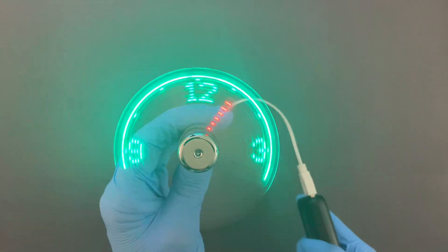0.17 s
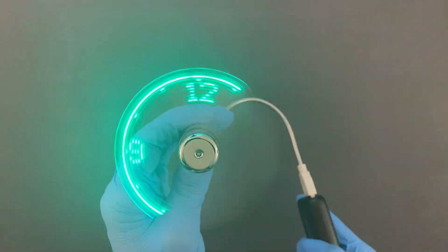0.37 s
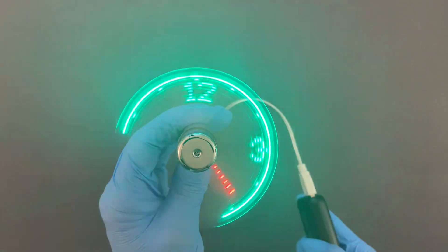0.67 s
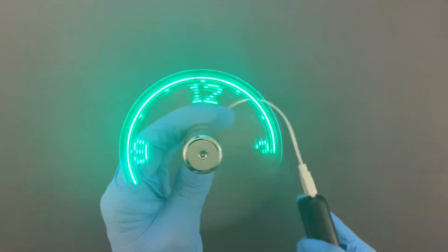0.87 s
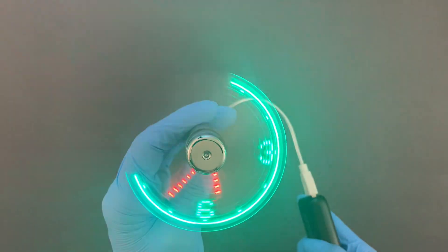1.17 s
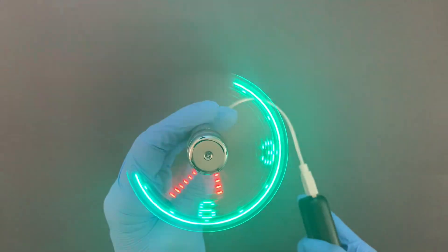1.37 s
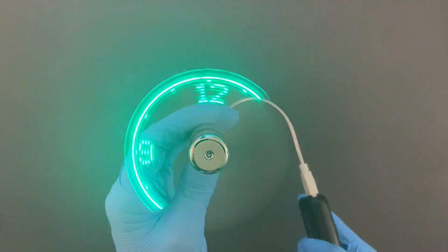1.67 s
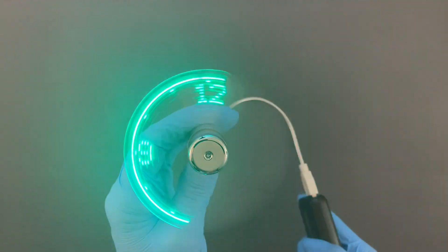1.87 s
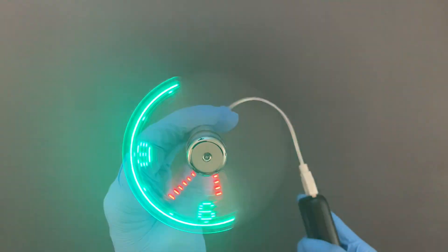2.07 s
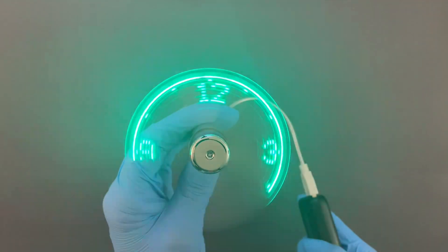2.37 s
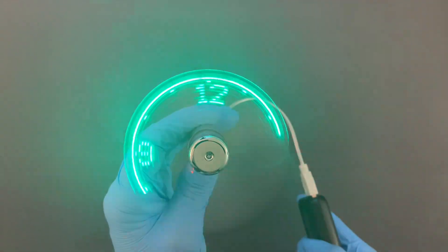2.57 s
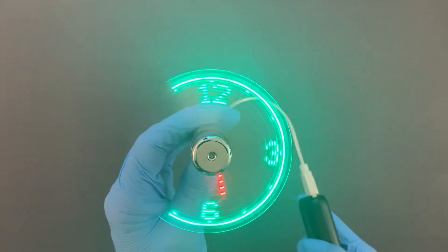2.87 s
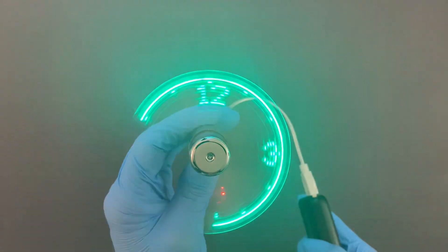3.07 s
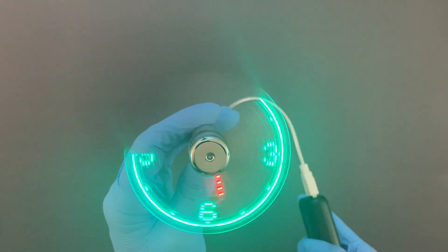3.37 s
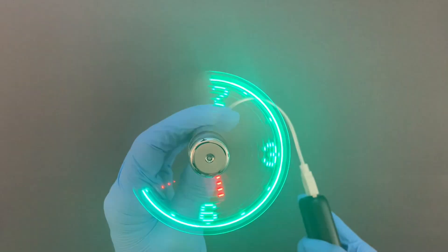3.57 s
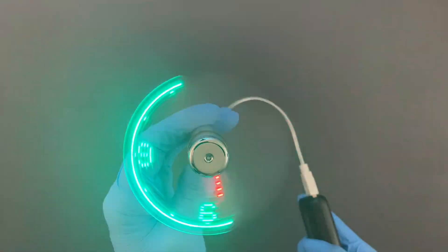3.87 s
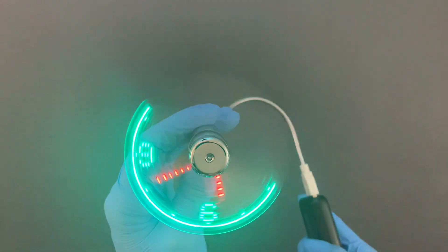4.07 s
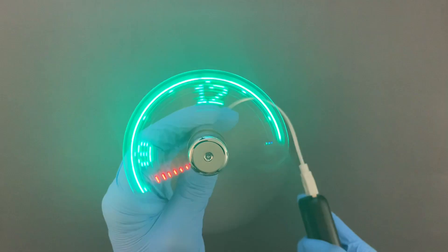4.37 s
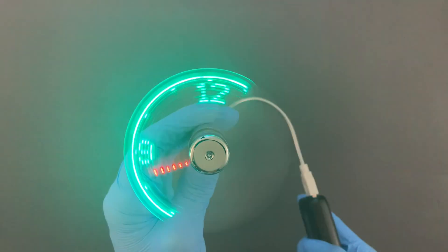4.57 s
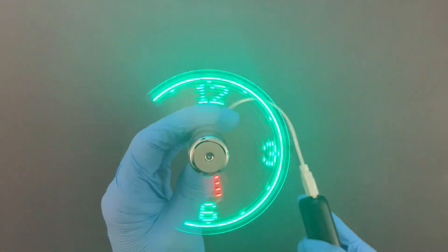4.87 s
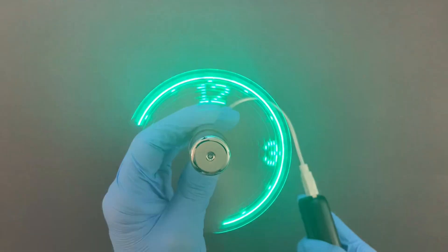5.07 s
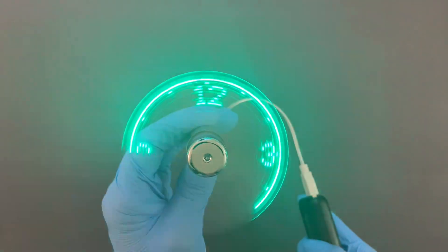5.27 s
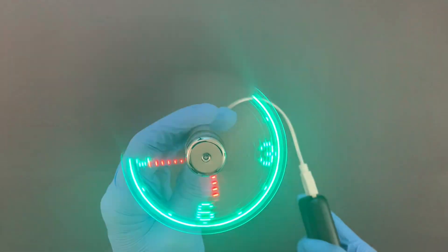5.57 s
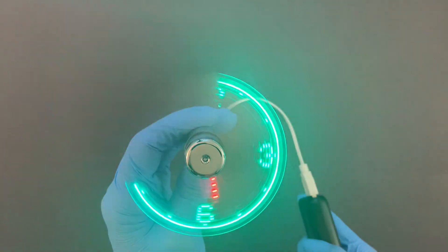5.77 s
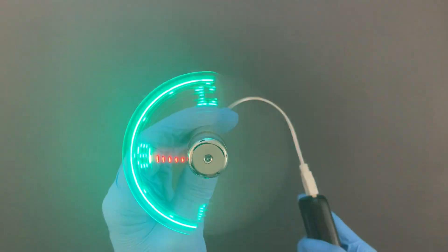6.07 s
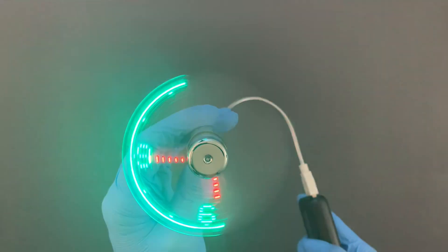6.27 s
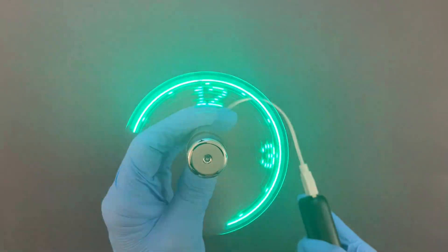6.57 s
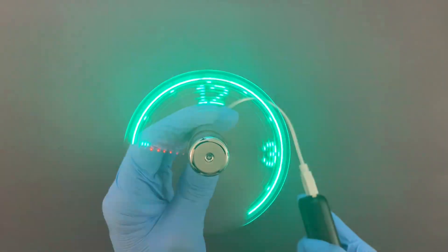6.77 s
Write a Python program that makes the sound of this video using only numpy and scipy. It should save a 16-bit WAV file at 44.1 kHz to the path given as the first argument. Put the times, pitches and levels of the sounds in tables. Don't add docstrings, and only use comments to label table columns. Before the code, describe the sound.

A small hand-held fan whines thinly under heavy, gusty wind rumble on the microphone while a button clicks in and out about twice a second.

```python
import sys
import numpy as np
from scipy import signal
from scipy.fft import rfft, irfft, next_fast_len
from scipy.io import wavfile
from scipy.ndimage import uniform_filter1d

SR = 44100
rng = np.random.default_rng(int(sys.argv[2]) if len(sys.argv) > 2 else 0)


def attenuation_scalar(level_db):
    decades = np.asarray(level_db, float) / 20
    return 10 ** decades


def file_out(sig):
    cols = np.atleast_2d(sig).T
    lim = np.clip(cols, -1, 1)
    pcm = np.round(lim * 32767).astype(np.int16)
    wavfile.write(sys.argv[1], SR, pcm)


N = 305833

# start_s (middle of the gust), length_s, rise_db, eddy_hz
GUSTS = [(0.083, 0.079, 11, 25), (4.85, 0.16, 7.5, 100), (0.348, 0.11, 7.5, 22), (0.618, 0.13, 11.5, 34.4),
         (0.975, .09, 3.5, 80), (1.128, 0.09, 14, 43.4), (1.364, 0.057, 12.5, 80), (1.471, .07, 14, 70),
         (1.618, 0.047, 23, 61), (1.7, 0.092, 7.5, 22), (1.836, 0.18, 9, 60), (2.04, 0.06, 13.5, 37.2),
         (2.23, 0.098, 4, 80), (2.381, 0.086, 11.5, 39.7), (2.597, 0.076, 18.5, 50), (2.86, 0.084, 5, 51),
         (3.082, 0.052, 8, 109), (3.118, .07, 7, 22), (3.201, .09, 15.5, 85), (3.372, 0.076, 17, 74.4),
         (3.743, 0.091, 11, 21.8), (4.111, 0.045, 17.5, 48.6), (4.301, 0.062, 11.5, 25),
         (4.599, 0.064, 24.5, 61.5), (5.028, 0.031, 19, 55), (5.11, 0.08, 11.5, 25),
         (5.168, 0.14, 14.5, 87.5), (5.387, 0.072, 13.5, 42.6), (5.88, 0.067, 1, 45), (6.585, 0.16, 10, 55)]
# pitch_hz, level_db (per Hz)
RUMBLE_TONE = [(2.9, -78), (5.0, -4.5), (21, 6.5), (32, -2.5), (62, -12), (113, -30.5), (141, -33),
               (172, -41), (253, -57.5), (400, -64), (520, -61), (880, -120)]
# start_s, level_db
STREAM = [(0, -6.5), (.5, 0.5), (.9, -2), (1.2, 2.5), (1.6, -1), (2, 3.5), (2.5, 2), (2.8, 3.5),
          (3.3, -0.5), (3.9, 3), (4.45, -0.5), (4.85, 3.5), (5.3, -0.5), (5.6, -1.5), (6, 4), (6.4, -1),
          (6.93, 0)]
# pitch_hz, calm_level_db, stream_share (part of the stream's changes felt)
EDDIES = [
    (25, -25, 1.0),
    (68, -38.5, 1),
    (136, -49.5, 0.34),
]
GUST_OCTAVES, RIPPLE_DB = 1.205, 1.07

# start_s, turns_per_s
SPEED = [(0, 35.76), (.6, 35.72), (.86, 35.64), (1.06, 35.0), (1.2, 34.9), (1.45, 34.95), (1.75, 35.29),
         (2.1, 35.41), (2.9, 35.46), (4.1, 35.42), (4.7, 35.32), (6.94, 35.11)]
HELD_GAIN, HELD_LAG_S = .14, .09
# pitch_hz, level_db (per Hz)
HOUSING_TONE = [(1300, -44), (1550, -1), (1800, -24), (2600, -18), (3100, -1), (3500, -3.5), (4100, -8),
                (4600, -14), (5800, -8), (6600, -12.5), (7600, -14), (10300, -22.5), (13000, -16.5),
                (15300, -22)]
# start_s, level_db, brightness_db (treble above the main resonance)
WHINE = [(0.0, -57.5, 0), (0.79, -58.5, 1.5), (3.32, -58.5, 2), (3.45, -59.5, 3), (5.9, -57.5, -0.5),
         (6.93, -60, 2.5)]
BLOWS = [.02, .18, .42, .72, .89]
# start_s, grip (0 thumb down, 1 loosened, 2 settled)
GRIP = [
    (0, 0),
    (.86, 0),
    (1.02, 1),
    (1.55, 1),
    (1.9, 2),
    (6.94, 2),
]
# multiple (of the shaft speed), thumb_down_db, loosened_db, settled_db
SINGING = [(6, -67, -68, -67), (8, -73, -73, -72), (10, -76, -76, -76), (44, -73, -72, -73),
           (82, -75, -79, -70), (83, -73, -70, -76), (85, -72, -73, -70), (87, -68, -76, -72),
           (89, -61, -65, -62), (90, -70, -72, -71), (91, -77, -72, -70), (92, -80, -72, -70),
           (93, -74, -62, -66), (95, -67, -72, -81), (96, -69, -69, -66), (97, -68, -71, -71),
           (98, -79, -68, -72), (99, -76, -71, -72), (104, -72, -80, -81), (106, -75, -74, -71),
           (114, -76, -75, -75), (154, -75, -91, -79), (156, -74, -76, -77), (158, -78, -77, -74),
           (160, -92, -76, -90), (162, -74, -74, -75), (168, -76, -76, -80), (169, -82, -75, -86),
           (170, -76, -83, -79), (172, -73, -83, -82)]

# start_s, peak_db, brightness_db (per octave)
PRESSES = [(2.0342, -18, 2.5), (2.5977, -18.5, 2), (3.1404, -18.5, 2.5), (3.7052, -19, 2),
           (4.2322, -18.5, 2), (4.7437, -18, 3), (5.277, -18.5, 2), (5.7436, -19.5, 1.5),
           (6.3886, -18.5, 3)]
# start_s, peak_db, brightness_db (per octave)
RELEASES = [(0.888, -17, 0), (2.1896, -17.5, 0), (2.755, -17.5, 0), (3.321, -17.5, 0), (3.858, -19, 0.007),
            (4.419, -18, 0), (4.926, -18, 0.0061), (5.4348, -18, 0), (5.8902, -18, 0.0086),
            (6.5445, -17.5, 0.0075)]
# pitch_hz, level_db (per Hz)
PRESS_TONE = [(290, -34), (500, -12), (910, 1.5), (1970, -0.5), (2320, -4.5), (2920, -5.5), (3920, -3),
              (4600, -10.5), (4950, -7), (5560, -9.5), (7660, -2), (11200, -20.5), (15200, -26),
              (16400, -59)]
# pitch_hz, level_db (per Hz)
RELEASE_TONE = [(290, -65), (500, -21), (896, -1.5), (1650, 1.5), (2350, -8.5), (2720, -17), (3150, -1),
                (4600, -12), (4950, 0.5), (5640, -14), (6530, -4), (10400, -20.5), (13900, -26.5),
                (16400, -22)]
# pitch_hz, press_db, release_db, decay_s (to fall 60 dB)
SHELL = [(940, -9, -4, .045), (1070, -18, -7, .04), (1615, -11, -1, .06), (1795, -15, -3, .05),
         (2078, -10, -4, .055), (2165, -14, -10, .05), (2280, -5, -1, .055), (2435, -12, -3, .05),
         (3080, -11, -7, .06), (3225, -11, -7, .05), (3400, -9, -2, .055), (3750, -12, -9, .05),
         (3980, -15, -10, .06), (4300, -12, -8, .05), (5082, -7, -2, .045), (5310, -11, -3, .045),
         (6430, -14, -3, .05), (6850, -7, -14, .045), (7110, -6, -14, .045), (7455, -3, -14, .045),
         (7820, -2, -14, .045), (8060, -2, -13, .035), (8360, -6, -12, .04)]

# pitch_hz, level_db (per Hz)
HISS_TONE = [(150, -9.5), (250, -3), (600, -8.5), (1000, -7.5), (1600, -10.5), (2300, -9), (3200, -11.5),
             (4500, -21.5), (6000, -19.5), (8500, -20.5), (10500, -33.5), (13500, -35), (15200, -24),
             (16000, -39)]
HISS_DB = -56
# pitch_hz, decay_s (to fall 60 dB)
ROOM = [(700, 0.041), (1850, 0.12), (4900, 0.12), (13000, 0.096)]
# delay_s, level_db
ECHOES = [(.0026, -31), (.0032, -1.5), (.0055, -18)]


def buffeting(hold_s=0.057, trim_db=(.3, -.7, -.7)):
    push = coloured(RUMBLE_TONE)
    below_45, below_90 = [
        signal.sosfiltfilt(signal.butter(4, hz, fs=SR, output="sos"), push) for hz in (45, 90)]
    eddies = below_45, below_90 - below_45, push - below_90
    total = np.zeros(N)
    for eddy, level_db, trim in zip(eddies, eddy_levels(), trim_db):
        power = smoothed(evened(eddy) ** 2, hold_s)
        held = eddy / np.sqrt(power + 0.026)
        total += attenuation_scalar(level_db + trim) * evened(held)
    return total


def eddy_levels():
    t = np.arange(0, N, 64) / SR
    stream_db = curve(STREAM)[0]
    start_s, length_s, rise_db, gust_hz = np.transpose(GUSTS)
    swell = np.exp(-(2 * (t[:, None] - start_s) / length_s) ** 2)
    levels = []
    for hz, calm_db, share in EDDIES:
        reach = np.exp(-(np.log2(gust_hz / hz) / GUST_OCTAVES) ** 2)
        gusts_db = np.interp(np.arange(N) / SR, t, swell @ (rise_db * reach))
        levels.append(calm_db + share * stream_db + RIPPLE_DB * wander(14) + gusts_db)
    return levels


def motor(path, count=30, size=8192, spread_db=-1.0, near_s=0.1):
    turns, grip = shaft_turns(), curve(GRIP)[0]
    angle, heavy, sign = rng.random((3, 4, count))
    strength = np.sign(sign - .5) * attenuation_scalar(-spread_db * np.log(heavy + 0.0065))
    multiples = np.arange(470)
    rest = ~np.isin(multiples, np.array(SINGING)[:, 0])
    patterns = []
    for a, s in zip(angle, strength):
        spectrum = np.exp(-2j * np.pi * np.outer(multiples, a)) @ s
        one_turn = irfft(rest * spectrum, size)
        patterns.append(evened(np.interp(turns % 1, np.arange(size) / size, one_turn, period=1)))
    taps, *changing = patterns
    for k, pattern in enumerate(changing):
        taps = taps + np.clip(1 - abs(grip - k), 0, 1) * pattern
    taps = evened(taps) + attenuation_scalar(-15) * rng.standard_normal(N)
    near_path = path[:2000] * attenuation_scalar(-60 * np.arange(2000) / SR / near_s)
    whine = evened(signal.oaconvolve(taps, np.convolve(causal(HOUSING_TONE), near_path))[:N])
    level_db, bright_db = curve(WHINE)
    treble = signal.sosfilt(signal.butter(2, 4500, "high", fs=SR, output="sos"), whine)
    whine = attenuation_scalar(level_db - 2.5) * (whine + (attenuation_scalar(bright_db) - 1) * treble)
    return whine + singing(turns, grip, multiples)


def singing(turns, grip, multiples, waver_db=1.0):
    blows = np.exp(-2j * np.pi * np.outer(multiples, BLOWS))
    phase = np.angle(blows @ [0.82, 0.79, 0.6, 0.84, 0.61])
    tones = np.zeros(N)
    for k, *grip_db in SINGING:
        level_db = np.interp(grip, range(3), grip_db) + waver_db * wander(2.415)
        tones += attenuation_scalar(level_db) * np.cos(2 * np.pi * k * turns + phase[k])
    return np.sqrt(2) * tones


def shaft_turns():
    t = np.arange(N) / SR
    held = sum((t > down[0]) & (t < up[0]) for down, up in zip(PRESSES, RELEASES[1:]))
    keep = np.exp(-1 / (HELD_LAG_S * SR))
    gain = HELD_GAIN * signal.lfilter([1 - keep], [1, -keep], held)
    return np.cumsum(curve(SPEED)[0] + gain) / SR


def button(events, snap, paths, which, ring_db, trim_db, dome_hz, dome_db, unlike=0.57):
    t = np.arange(4000) / SR
    ring = np.zeros(4000)
    for mode in SHELL:
        hz, decay_s = mode[0], mode[3]
        ring += attenuation_scalar(mode[which] - 60 * t / decay_s) * np.sin(2 * np.pi * (hz * t + rng.random()))
    ring *= attenuation_scalar(ring_db) * np.clip(t / 0.0007, 0, 1) / np.linalg.norm(ring)
    for s, db in [(0.00046, 0)] + ECHOES:
        burst = np.exp(-((t - s - .0004) / 0.00021) ** 2)
        ring += attenuation_scalar(dome_db + db) * np.sin(2 * np.pi * dome_hz * (t - s)) * burst
    out = np.zeros(N + SR)
    for k, (s, db, bright_db) in enumerate(events):
        tilted = [(f, g + bright_db * np.log2(f / 4000)) for f, g in snap]
        path = paths[0] + unlike * (paths[1 + k % 4] - paths[0])
        click = signal.fftconvolve(causal(tilted), path)[:4000] + ring
        at = round((s + .0009) * SR)
        out[at:at + 4000] += attenuation_scalar(db + trim_db) * click
    return out[:N]


def air(once=0.24, twice=0.098, flicker_db=1.0, flicker_s=0.0082):
    turn = 2 * np.pi * shaft_turns()
    hiss = attenuation_scalar(HISS_DB + 0.49 * wander(6)) * coloured(HISS_TONE)
    flicker = evened(smoothed(rng.standard_normal(N), flicker_s))
    sweep = 1 + once * np.cos(turn) + twice * np.cos(2 * turn + 1)
    return hiss * sweep * attenuation_scalar(flicker_db * flicker)


def room(size=9000, start_s=0.00029, wet_db=5.5):
    hz, t, z = signal.stft(rng.standard_normal(size), SR, nperseg=128)
    fading = z * attenuation_scalar(-60 * t / read(ROOM, hz)[:, None])
    tail = signal.istft(fading, SR, nperseg=128)[1][:size]
    tail *= np.clip(np.arange(size) / SR / start_s - .5, 0, 1)
    path = np.zeros(size)
    path[0] = -0.83
    for s, db in ECHOES:
        path[round(s * SR):] += attenuation_scalar(db) * path[:size - round(s * SR)]
    return path + attenuation_scalar(wet_db) * tail / np.linalg.norm(tail)


def evened(x):
    return x / np.sqrt(np.mean(x ** 2) + 1e-20)


def smoothed(x, length_s):
    return uniform_filter1d(uniform_filter1d(x, int(length_s * SR)), int(length_s * SR))


def read(points, hz):
    f, value = np.transpose(points)
    return np.interp(np.log(hz + 1), np.log(f + 1), value)


def curve(rows):
    s, *columns = np.transpose(rows)
    return [np.interp(np.arange(N) / SR, s, c) for c in columns]


def wander(hz):
    count = int(N * hz / SR) + 2
    return evened(np.interp(np.arange(N) * hz / SR, np.arange(count), rng.standard_normal(count)))


def coloured(points):
    size = next_fast_len(N)
    gain = attenuation_scalar(read(points, np.fft.rfftfreq(size, 1 / SR)))
    return evened(irfft(rfft(rng.standard_normal(size)) * gain, size)[:N])


def causal(points, size=4096):
    log_gain = np.log(attenuation_scalar(read(points, abs(np.fft.fftfreq(size, 1 / SR)))))
    taps = np.fft.ifft(np.exp(np.conj(signal.hilbert(log_gain)))).real[:size // 2]
    return taps / np.linalg.norm(taps)


def scene():
    paths = [room() for _ in range(5)]
    clicks = button(PRESSES, PRESS_TONE, paths, which=1, ring_db=3.5, trim_db=6.0,
                    dome_hz=7300, dome_db=-10)
    clicks += button(RELEASES, RELEASE_TONE, paths, which=2, ring_db=4.5, trim_db=4.5,
                     dome_hz=5950, dome_db=-13.0)
    return (buffeting() + motor(paths[0]) + air() + clicks)[None]


def roll_off(x):
    return signal.sosfilt(signal.butter(12, 16520, fs=SR, output="sos"), x)


def record(dry):
    top_edge = signal.cheby2(12, 30, 15900, fs=SR, output="sos")
    mix = signal.sosfiltfilt(top_edge, dry)
    return roll_off(mix)


dry = scene()
out = record(dry)
file_out(out)
```